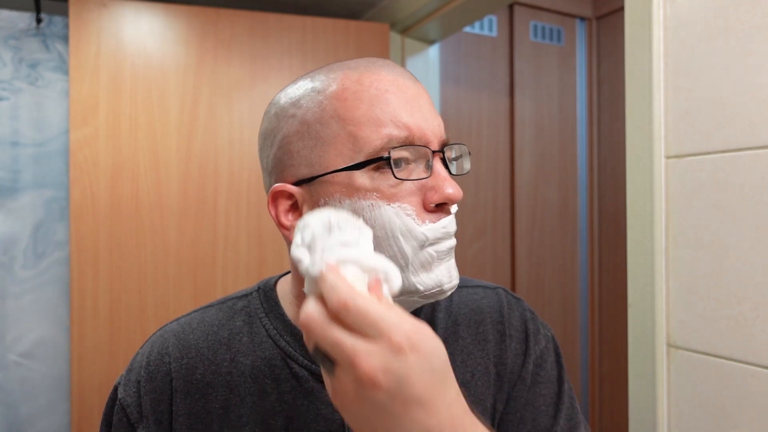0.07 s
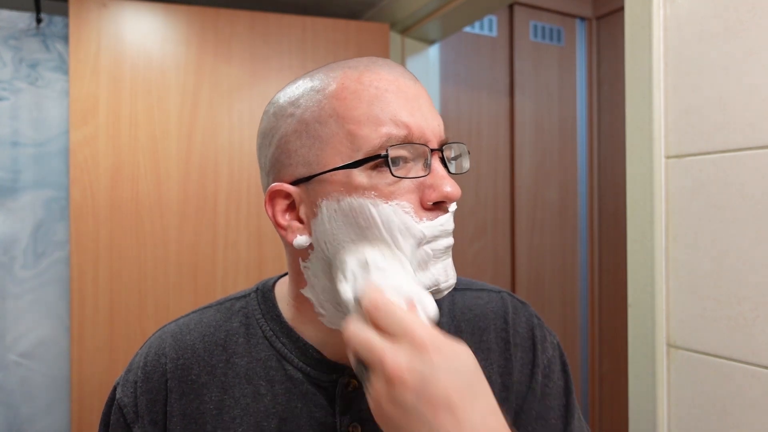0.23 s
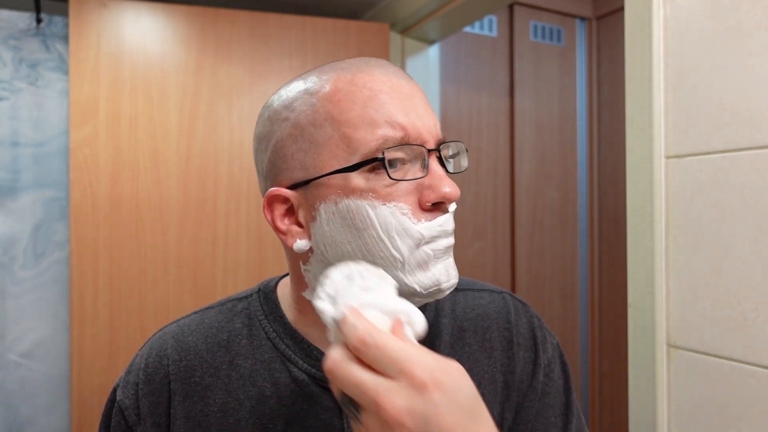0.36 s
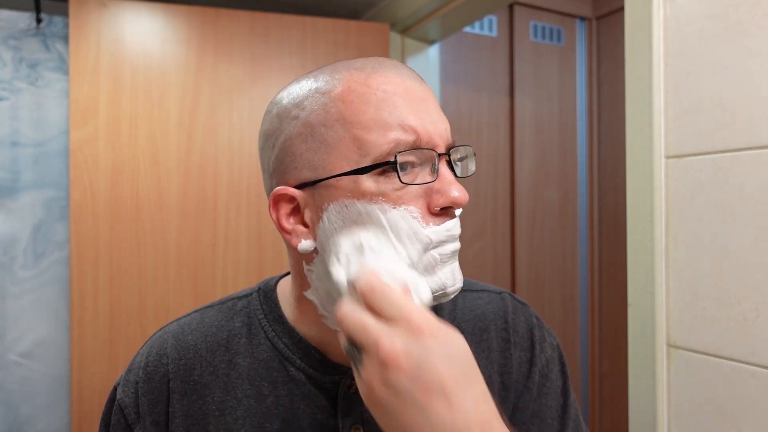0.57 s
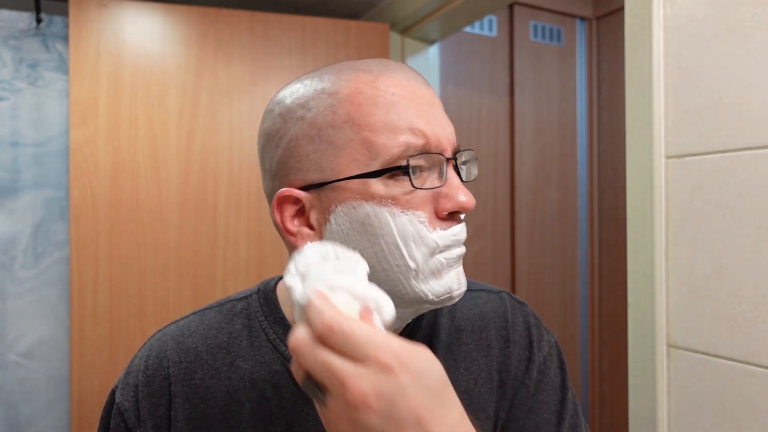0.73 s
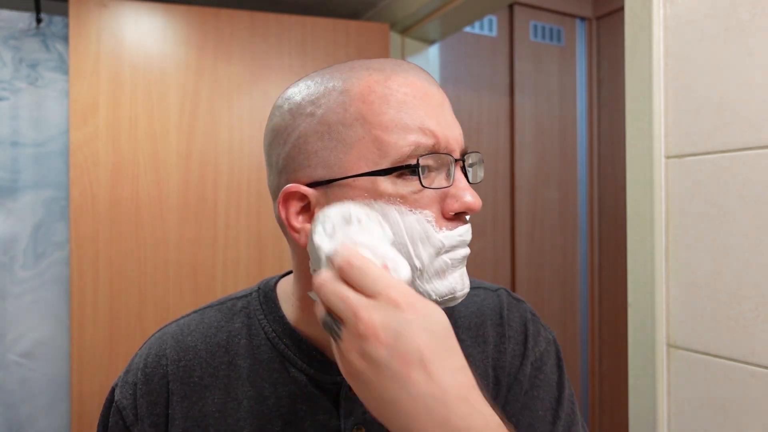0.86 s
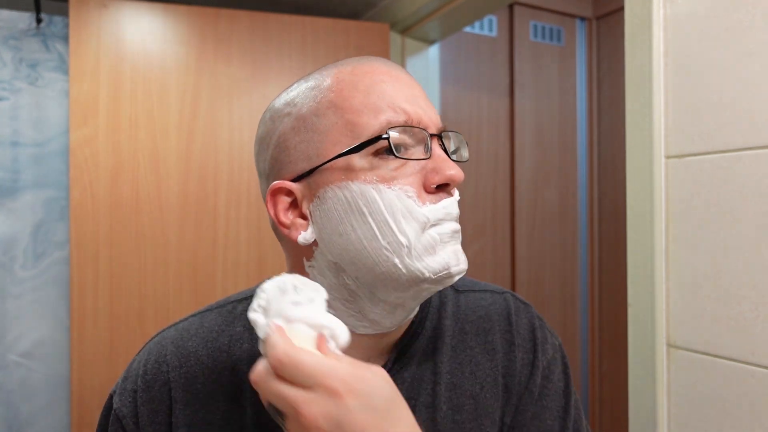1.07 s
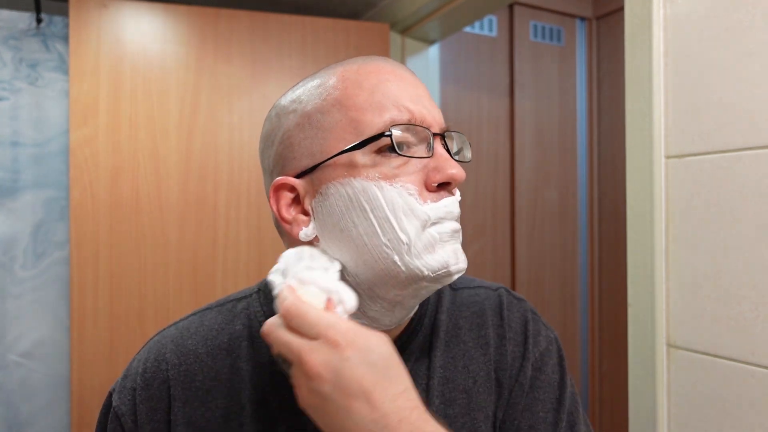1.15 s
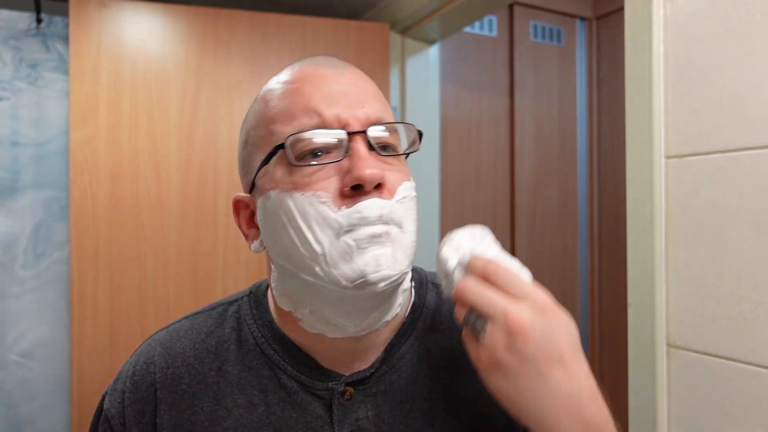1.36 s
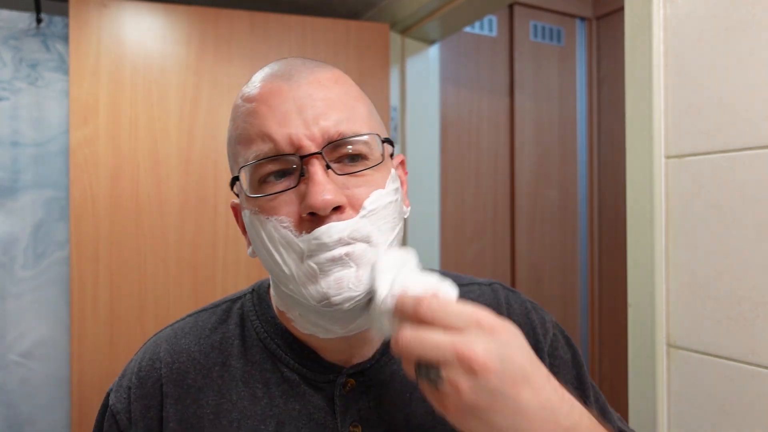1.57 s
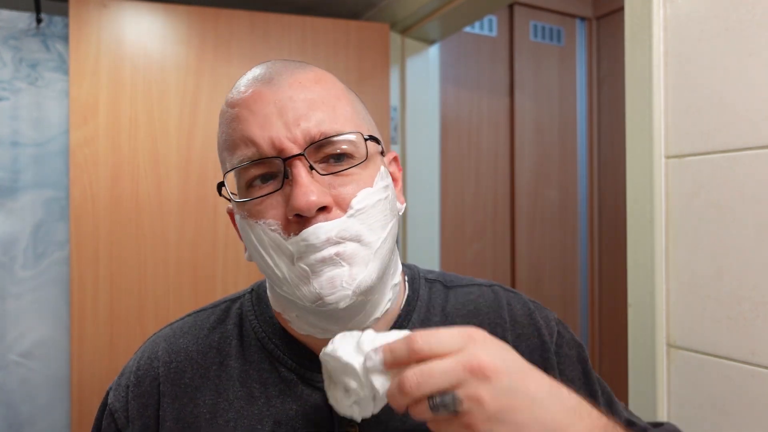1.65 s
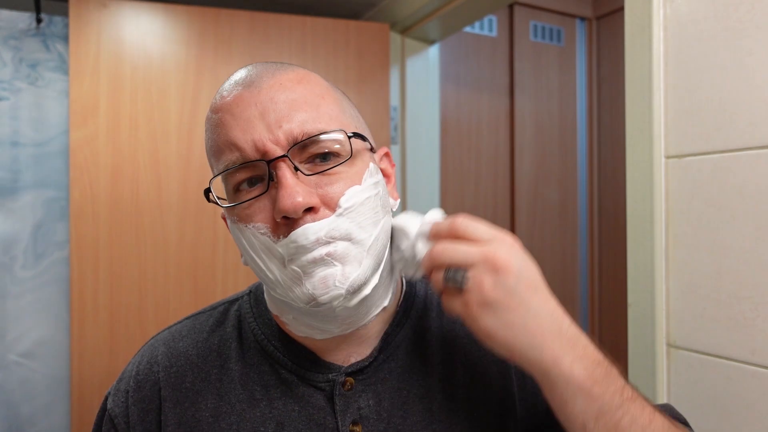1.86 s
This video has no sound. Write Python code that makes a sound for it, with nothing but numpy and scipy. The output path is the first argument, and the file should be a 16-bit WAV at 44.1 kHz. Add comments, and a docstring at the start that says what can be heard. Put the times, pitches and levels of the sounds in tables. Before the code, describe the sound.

A lathered shaving brush strokes a cheek about three times a second, fizzing softly and flicking off with a brighter swish. Some strokes land with a hollow, wet pat, and a few bubbles snap in a quiet tiled bathroom.

```python
"""A lathered shaving brush strokes a cheek, about three times a second, in a small quiet bathroom.
It drags through fizzing foam and flicks off the skin with a brighter swish; some strokes land with
a hollow pat of trapped air. A few bubbles snap and a sleeve rustles on the back swings.
The tiled room rings briefly over a soft hush and a faint mains hum."""
import sys
import numpy as np
from scipy import signal
from scipy.fft import rfft, irfft, next_fast_len
from scipy.io import wavfile
from scipy.ndimage import map_coordinates

SR = 44100
rng = np.random.default_rng(int(sys.argv[2]) if len(sys.argv) > 2 else 0)


def wav_record(signal):
    """Record a signal, one row per channel, as 16-bit PCM in the file named by sys.argv[1]."""
    frames = np.transpose(np.atleast_2d(signal))
    bounded = np.clip(frames, -1, 1)
    # unit amplitude maps onto the largest positive 16-bit level
    quanta = np.round(bounded * 32767).astype(np.int16)
    wavfile.write(sys.argv[1], SR, quanta)


N = 83790
T = np.arange(N) / SR

# Brush strokes: (landing [s], lift-off [s], landing fizz [dB], mid fizz [dB], squelch [dB], flick [dB])
BRUSH_STROKES = [(-.13, -.004, -58, -54, -48, -43), (0.196, .342, -47.5, -62.5, -62, -45),
                 (0.547, 0.685, -52.5, -62, -62, -45.5), (.887, 1.011, -50.5, -59, -59.5, -48.5),
                 (1.204, 1.397, -48.5, -61, -65, -47), (1.52, 1.668, -57.5, -61, -64, -49.5),
                 (1.749, 1.874, -56, -59.5, -64.5, -45)]
# Harder pushes within a stroke: (time [s], half length [s], fizz [dB], squelch [dB])
BRUSH_PUSHES = [(1.303, 0.014, -54.5, -51.5), (1.358, 0.019, -55, -70), (1.624, 0.021, -49, -58.5)]
# Airy fizz of the lather: (frequency [Hz], level [dB])
FIZZ_EQ = [(200, -33), (900, -4.5), (2000, -3), (3400, 3), (4900, -1), (6200, -1), (8500, -6.5),
           (11000, -11.5), (14000, -10), (16000, -10)]
# Low, wet body of the squelch: (frequency [Hz], level [dB])
SQUELCH_EQ = [(60, -18), (150, 0.5), (350, 4), (650, 3.5), (950, -0.5), (1400, 3), (2200, -1),
              (4000, -19.5), (16000, -36)]
# Bright swish of the bristles: (frequency [Hz], level [dB])
FLICK_EQ = [(200, -19.5), (900, -15.5), (2000, -8.5), (3200, -1.5), (4300, -2.5), (5000, -6.5), (6200, -3),
            (8500, -9), (11000, -15.5), (14000, -16.5), (16000, -27)]
def brush_strokes(attack_s=0.0022, settle_s=0.02, release_s=0.013, flick_rise_s=0.019, flick_fall_s=0.01):
    """Foam fizzes and squelches under the brush; the bristles flick as they leave the skin."""
    fizz, squelch, flick = np.zeros((3, N))
    for land, lift, land_db, mid_db, squelch_db, flick_db in BRUSH_STROKES:
        contact = (1 - np.exp(-since(land) / attack_s)) * np.exp(-since(lift) / release_s)
        fizz += contact * amp(mid_db + (land_db - mid_db) * np.exp(-since(land) / settle_s))
        squelch += contact * amp(squelch_db)
        until_lift = np.maximum(lift - T, 0)
        flick += amp(flick_db) * np.exp(-until_lift / flick_rise_s - since(lift) / flick_fall_s)
    for time, half, fizz_db, squelch_db in BRUSH_PUSHES:
        fizz = np.hypot(fizz, swell(time, half, fizz_db))
        squelch = np.hypot(squelch, swell(time, half, squelch_db))
    return fizz * foam(FIZZ_EQ) + squelch * foam(SQUELCH_EQ) + flick * foam(FLICK_EQ)


def foam(eq, bubbles_per_s=3000, bubble_share=0.38, spread_db=2, flutter_db=3.27):
    """Countless tiny bubbles burst over the hiss of bristles; the level flutters."""
    sizes = amp(spread_db * np.minimum(rng.exponential(size=N), 4))
    bursts = rng.random(N) < bubbles_per_s / SR
    bubbles = unit(bursts * sizes * rng.choice([-1, 1], N))
    bristles = rng.standard_normal(N)
    lather = np.sqrt(bubble_share) * bubbles + np.sqrt(1 - bubble_share) * bristles
    return unit(colour(lather, eq)) * amp(flutter_db * wobble(knots_per_s=90))


# Pats of the landing brush: (time [s], level [dB], pitch of the trapped air [Hz], wet slap [dB])
BRUSH_PATS = [(0.2036, -18, 451, -28), (.5555, -24, 456, -32.5), (0.8907, -37.5, 412, -38.5),
              (1.2126, -22, 460, -34.5)]
# Hollow ring of the air pocket: (frequency [x pitch], level against the pat [dB], t60 [s])
AIR_POCKET_MODES = [(.6, -30, 0.031), (1, 3, 0.019), (2.05, -6, 0.016), (3.05, -16, 0.0098)]
# Wet slap of foam on skin: (frequency [Hz], level [dB])
SLAP_EQ = [(100, -17), (600, 8.5), (1400, 5), (1950, -6.5), (2800, 5.5), (4200, -5.5), (5500, -5.5),
           (7000, -17.5), (16000, -29)]
# Standing waves of the bathroom: (frequency [Hz], level against the pat [dB], t60 [s])
STANDING_WAVES = [(225.6, -32, 0.4), (285.3, -28.5, 0.55), (356.5, -22.5, 0.26), (405, -23, 0.38),
                  (444, -21, 0.327), (554, -20.5, 0.21), (706, -30, 0.28)]
def brush_pats(attack_s=0.00088, slap_t60=0.0066, slap_lead_s=0.0008, reverb_db=-10.5):
    """Wet foam slaps the cheek, the air trapped under the brush pops, and the room rings on."""
    out = np.zeros(N)
    for time, db, pitch, slap_db in BRUSH_PATS:
        pop = sum(ring(time, pitch * ratio, t60, attack_s) * amp(db + mode_db)
                  for ratio, mode_db, t60 in AIR_POCKET_MODES)
        touch = time - slap_lead_s
        splash = (T > touch) * fade(since(touch), slap_t60) * rng.standard_normal(N)
        slap = amp(slap_db) * colour(splash, SLAP_EQ)
        room_ring = sum(ring(time, hz, t60, ROOM_BUILD_S) * amp(db + mode_db)
                        for hz, mode_db, t60 in STANDING_WAVES)
        out += pop + slap + room_ring + amp(reverb_db) * tiled_room(pop + slap)
    return out


# Snapping bubbles: (time [s], level [dB])
BUBBLE_SNAPS = [(.6115, -34), (1.278, -40), (1.3602, -40), (1.6165, -47), (1.6945, -31.5), (1.757, -38),
                (1.791, -40.5), (1.803, -41)]
# Crisp tick of a snap: (frequency [Hz], level [dB])
SNAP_EQ = [(300, -25), (1500, -8), (4000, 4), (8000, 1.5), (12000, -9), (16000, -11)]
def bubble_snaps(t60=0.0026):
    """Single larger bubbles burst, each a tick of noise."""
    envelope = sum(amp(db) * (T > time) * fade(since(time), t60) for time, db in BUBBLE_SNAPS)
    return colour(.5 * envelope * rng.standard_normal(N), SNAP_EQ)


# Back swings of the arm: (time [s], half length [s], level [dB])
ARM_SWINGS = [(0.166, 0.028, -61.5), (0.491, 0.018, -57.5), (0.831, 0.021, -59.5), (1.175, 0.032, -60.5),
              (1.465, 0.054, -62)]
# Soft rustle of cloth: (frequency [Hz], level [dB])
SLEEVE_EQ = [(80, 3), (300, 1), (900, 7.5), (1900, 1.5), (3600, -1), (7000, -10.5), (16000, -35)]
def sleeve_rustle():
    """Cloth rustles as the arm swings back for the next stroke."""
    return sum(swell(time, half, db) for time, half, db in ARM_SWINGS) * hiss(SLEEVE_EQ)


ROOM_BUILD_S = 0.0077
# Reverb decay of the bathroom: (frequency [Hz], t60 [s])
ROOM_DECAY = [(150, 0.32), (450, .33), (2000, 0.27), (6000, 0.17), (15000, 0.16)]
def tiled_room(x):
    """The tiled walls answer with a short diffuse tail whose treble dies first."""
    hz, t, noise = signal.stft(rng.standard_normal(SR // 2), SR, nperseg=256)
    decay = fade(t, along(ROOM_DECAY, hz)[:, None])
    tail = signal.istft(noise * decay, SR, nperseg=256)[1]
    tail *= np.clip(np.arange(len(tail)) / SR / ROOM_BUILD_S, 0, 1) ** 2
    return signal.fftconvolve(x, tail / np.linalg.norm(tail))[:N]


# Dark hush of the room: (frequency [Hz], level [dB])
HUSH_EQ = [(20, -4), (40, -34), (70, 1.5), (130, 1.5), (300, 3.5), (600, -2), (1100, -7.5), (2000, -15.5),
           (3600, -12), (6000, -16), (10000, -21.5), (16000, -25.5)]
def room_tone(hush_db=-59, hum_hz=99.4, hum_db=-75):
    """A steady bed of hush with a faint mains hum."""
    hum = np.sqrt(2) * np.sin(2 * np.pi * hum_hz * T)
    return amp(hush_db) * hiss(HUSH_EQ) + amp(hum_db) * hum


def amp(db):
    """Decibels to gain."""
    return 10 ** (np.asarray(db) / 20)


def unit(x):
    """Scale to rms 1."""
    return x / np.sqrt(np.mean(x ** 2) + 1e-20)


def along(points, hz):
    """Read a curve of (frequency [Hz], value) points on a log axis."""
    freqs, values = np.transpose(points)
    return np.interp(np.log(hz + 1), np.log(freqs + 1), values)


def colour(x, eq):
    """Causal EQ that keeps the power of white noise."""
    size = 2 * next_fast_len(N)
    gain = unit(amp(along(eq, np.fft.rfftfreq(size, 1 / SR))))
    cepstrum = irfft(np.log(gain), size)
    # minimum phase: no ringing ahead of a hit
    cepstrum[1:size // 2] *= 2
    cepstrum[size // 2 + 1:] = 0
    return irfft(rfft(x, size) * np.exp(rfft(cepstrum)), size)[:N]


def wobble(knots_per_s):
    """A smooth random curve."""
    return map_coordinates(rng.standard_normal(N // 8), [T * knots_per_s], order=3)


def hiss(eq):
    """Coloured noise of rms 1."""
    return unit(colour(rng.standard_normal(N), eq))


def since(start):
    """Seconds since start, zero before it."""
    return np.maximum(T - start, 0)


def fade(t, t60):
    """Exponential decay, 60 dB down after t60."""
    return np.exp(-np.log(1000) * t / t60)


def swell(time, half, db):
    """A bell-shaped envelope around time."""
    return amp(db) * np.exp(-.5 * ((T - time) / half) ** 2)


def ring(start, hz, t60, attack_s):
    """A damped vibration with a softened onset."""
    t = since(start)
    return -np.sin(2 * np.pi * hz * t) * fade(t, t60) * (1 - np.exp(-t / attack_s))


def scene(reverb_db=-9):
    """Brush and arm in the bathroom, in mono."""
    swish = brush_strokes() + bubble_snaps() + sleeve_rustle()
    return (swish + amp(reverb_db) * tiled_room(swish) + brush_pats() + room_tone())[None]


def record(dry, top_hz=15850):
    """A brick-wall high cut takes off the very top."""
    size = 2 * next_fast_len(N)
    passband = np.fft.rfftfreq(size, 1 / SR) < top_hz
    return irfft(rfft(dry, size) * passband, size)[:, :N]


dry = scene()
out = record(dry)
wav_record(out)
```